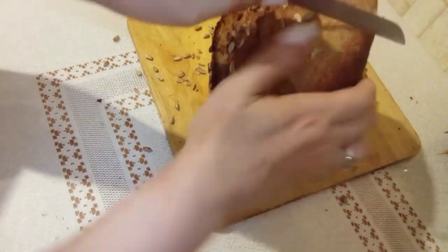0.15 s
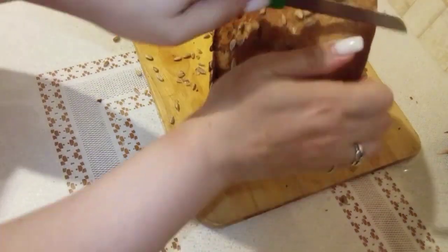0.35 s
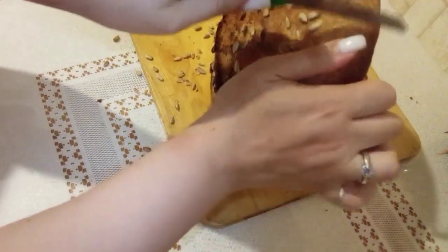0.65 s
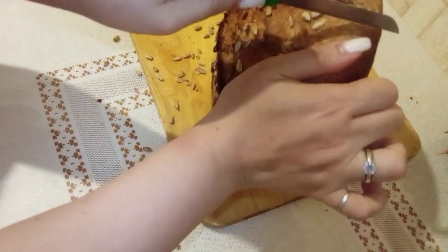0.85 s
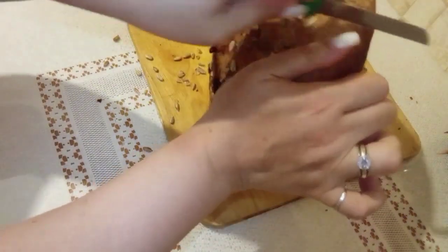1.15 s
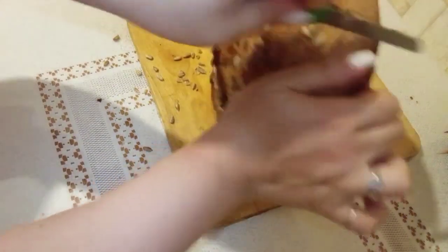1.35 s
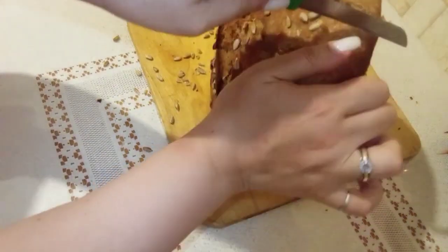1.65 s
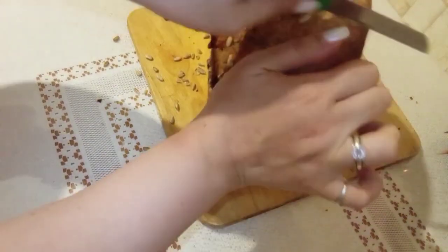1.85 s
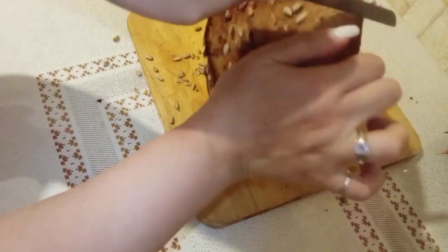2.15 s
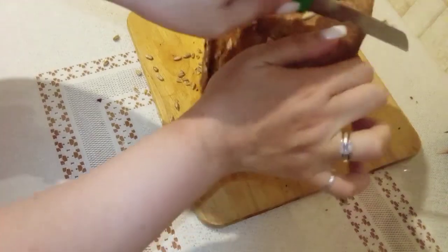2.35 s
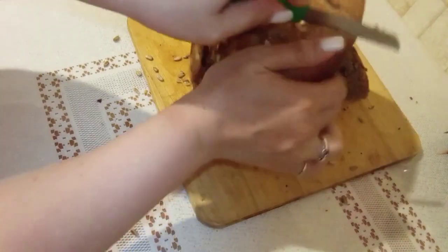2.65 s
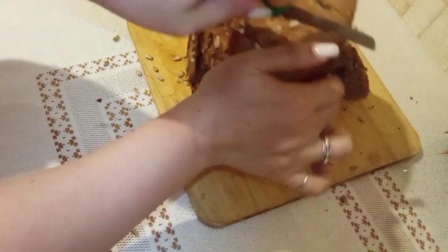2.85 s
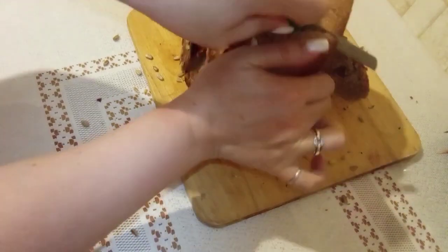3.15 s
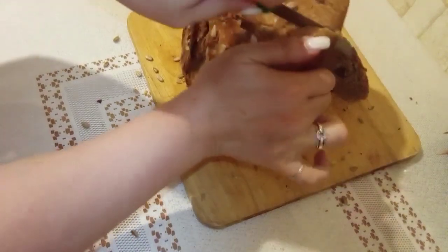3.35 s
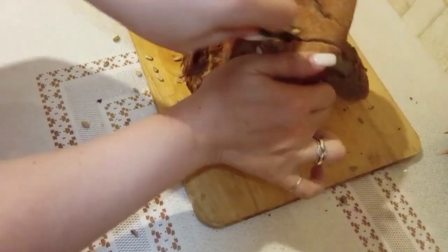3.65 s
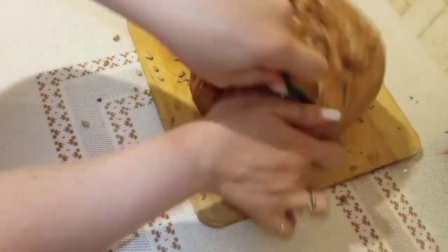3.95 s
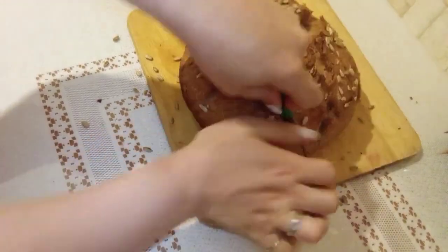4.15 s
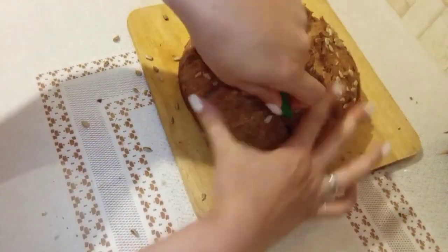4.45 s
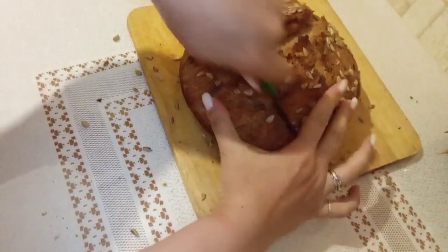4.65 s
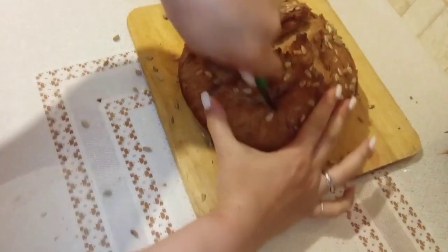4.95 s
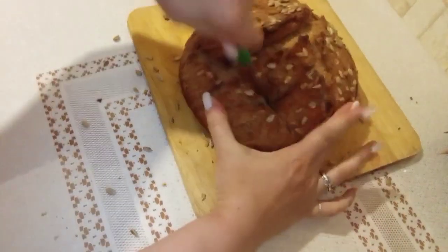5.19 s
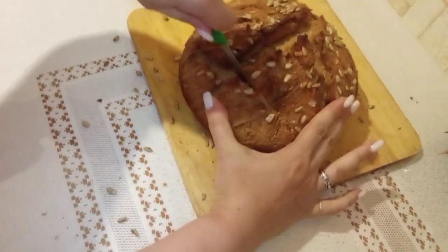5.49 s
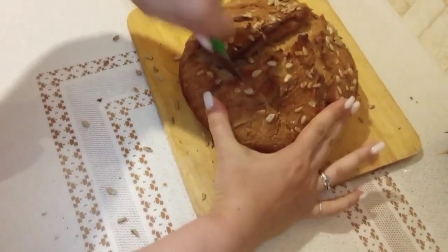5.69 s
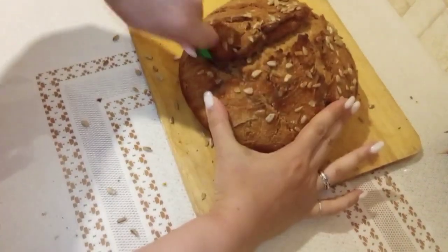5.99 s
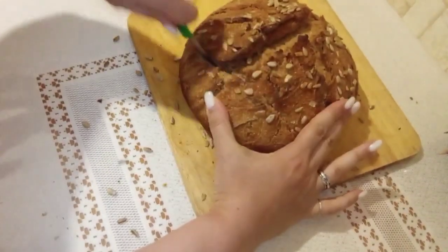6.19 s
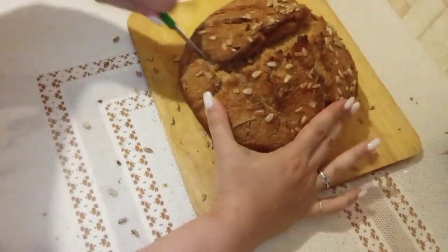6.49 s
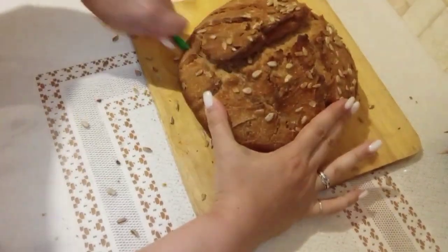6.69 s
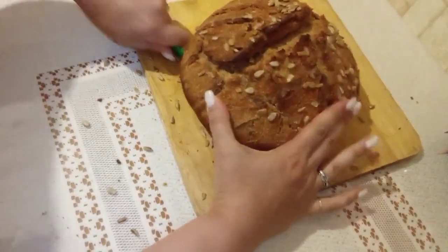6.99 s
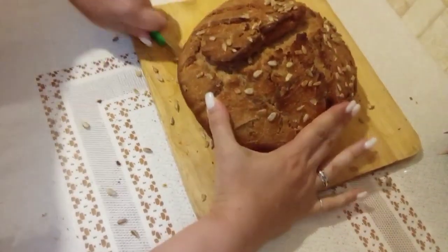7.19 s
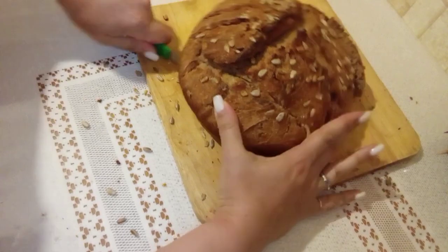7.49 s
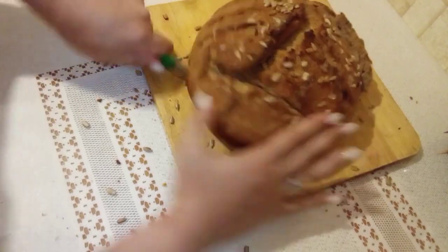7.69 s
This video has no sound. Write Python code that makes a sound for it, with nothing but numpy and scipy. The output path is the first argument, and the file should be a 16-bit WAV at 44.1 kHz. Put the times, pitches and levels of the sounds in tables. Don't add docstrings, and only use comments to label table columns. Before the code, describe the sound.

A close phone microphone picks up bread being cut on a wooden board in a small, quiet kitchen with a short echo, soft room air and a barely audible fridge hum. The first 0.8 seconds are nearly silent, with tiny ticks. A small crack and knock at 0.8 begin light, uneven sawing, about five strokes a second, raspy and gritty, strongest near 1.4 and 1.9. A crisp crack snaps at 2.65. From 3.0 to 3.6 the crust tears loudly in brittle crunches, peaking with a sharp snap at 3.5. At 4.2 a heavy low thump comes with a crunch, followed by little seed ticks. Slower pressing strokes crunch and knock the board at 4.9, 5.25, 5.6 (the fullest) and 6.0, thumping the table. Smaller crackles at 6.3, 6.65 and 6.95 mix with thin squeaky rubs. After 7.1 only faint rubbing and a tick remain.

```python
import sys
import numpy as np
from scipy import signal
from scipy.io import wavfile
from scipy.ndimage import uniform_filter1d

SR = 44100
rng = np.random.default_rng(int(sys.argv[2]) if len(sys.argv) > 2 else 0)


def gain_from_db(level_db):
    decades = np.asarray(level_db, float) / 20
    return 10 ** decades


def master_out(mix):
    frames = np.transpose(np.atleast_2d(mix))
    ceiling = np.clip(frames, -1, 1)
    pcm = np.round(ceiling * 32767).astype(np.int16)
    wavfile.write(sys.argv[1], SR, pcm)


N = 345303

# peak_s, tearing_db, rise_s, fall_s, board_shake_above_tearing_db
KNIFE_STROKES = [(1.077, -58, 0.11, 0.16, 3.5), (1.238, -54, 0.095, 0.076, 6.5),
                 (1.439, -39.5, 0.066, 0.099, -9), (1.635, -45, 0.055, 0.12, -11),
                 (1.889, -41.5, 0.1, 0.11, -5.5), (2.121, -51, 0.11, 0.079, -4),
                 (2.332, -54, 0.079, 0.39, -3), (2.519, -68, 0.22, 0.084, 15),
                 (2.649, -51.5, 0.01, 0.15, -29), (2.868, -45, 0.056, 0.051, -20),
                 (3.033, -62, 0.26, 0.1, -33), (3.136, -29, 0.059, 0.11, -10),
                 (3.348, -37.5, 0.13, 0.078, -7.5), (3.502, -31, 0.052, 0.13, -6),
                 (3.723, -46, 0.29, 0.054, -6), (3.844, -45, 0.065, 0.099, -30),
                 (4.149, -55, 0.085, 0.068, -4.5), (4.196, -36.5, 0.027, 0.051, 2.5),
                    (4.499, -58.5, 0.035, 0.18, -26), (4.706, -45.5, 0.16, 0.2, -1.5),
                    (4.911, -33.5, 0.078, .11, 1), (5.072, -68, 0.19, 0.17, 19.5),
                    (5.266, -33.5, 0.037, 0.1, 4), (5.628, -28.5, 0.046, 0.096, -5.5),
                    (5.82, -49, 0.32, 0.38, -6), (5.989, -36.5, 0.039, 0.064, -4),
                    (6.096, -56, 0.24, 0.059, 3.5), (6.303, -36.5, 0.045, 0.11, -4.5),
                    (6.663, -36, 0.081, 0.099, -8.5), (6.884, -56.5, 0.25, 0.25, -10),
                    (6.97, -37, 0.035, 0.12, 1.5), (7.042, -42, .15, 0.083, 3), (7.2, -68.5, .15, 0.091, 0),
                    (7.361, -60.5, 0.13, 0.072, -2.5), (7.47, -64, 0.066, 0.15, -7),
                    (7.83, -62, 0.29, .1, -4)]
# time_s, scraping_db, board_shake_above_scraping_db,
# crumb_fizz_above_tearing_db, pressed_board_region_hz
BLADE_CONTACT = [(0, -83.5, -24, -20, 400), (.9, -92, 0, -4, 434), (1.25, -97, -4, -8, 455),
                 (1.451, -67, -10, -8, 830), (1.9, -80, -23, -10.5, 494), (2.4, -69.5, 15, -2.5, 413),
                 (2.8, -80, -38, -14, 650), (3.2, -52.5, -11, -6.5, 630), (3.85, -66.5, -1, -11, 514),
                 (3.999, -63.5, 9.5, -15, 453), (4.398, -75, -3.5, -8, 600), (5.351, -59, -5, -10, 756),
                 (5.56, -77, 10, -16.5, 600), (5.75, -68.5, -13, -3.5, 600), (6.5, -72, 1.5, -16, 474),
                 (6.65, -89, -14, -5, 600), (7.05, -71, -5, -26, 423), (7.3, -80, -12, -8, 600)]
SCRAPING, SHAKE, FIZZ, PRESSED = 1, 2, 3, 4
# pitch_hz, level_db (per Hz)
CRUST_COLOUR = [(530, -46), (900, -6.5), (1270, -2.5), (1410, 2.5), (2440, 1.5), (3470, 0), (3830, 0),
                (5260, 1), (7950, -11.5), (9660, -5.5), (13400, -21), (15200, -11), (15900, -11),
                (16500, -17)]
# pitch_hz, width_hz, level_db
BOARD_MODES = [(206.7, 24, -5), (261.4, 30.3, -4), (316.6, 48, 3), (407.7, 118.4, 4), (538.6, 45, -2),
               (600, 13.3, -13), (680, 147, -1.5), (799.3, 190, 4.5), (958, 110, -4), (1027, 260, -3)]
# pitch_hz, width_hz, level_db
TABLE_MODES = [(65, 20, -30.5), (102, 75, -17), (120, 25.4, 7)]
# peak_s, level_db, rise_s, fall_s
ARM_PUSHES = [(1.09, -47.5, 0.087, 0.23), (1.24, -47.5, 0.062, 0.052), (1.633, -52, 0.048, 0.12),
              (1.956, -45.5, 0.061, 0.11), (2.123, -50, 0.13, 0.091), (2.334, -51, 0.059, 0.096),
              (2.519, -47, 0.06, 0.15), (3.15, -44, 0.084, 0.17), (3.49, -41.5, 0.044, 0.23),
              (3.72, -50, 0.16, 0.039), (3.996, -46, 0.11, 0.038), (4.2, -29.5, 0.033, 0.075),
              (4.93, -44.5, 0.12, 0.23), (5.09, -56, 0.14, 0.24), (5.264, -37.5, 0.076, 0.1),
              (5.64, -31, 0.11, 0.2), (5.86, -42.5, 0.1, 0.42), (5.989, -30.5, 0.092, .06),
              (6.096, -45, 0.12, 0.076), (6.33, -53.5, 0.14, 0.18), (6.68, -40, 0.072, 0.092),
              (6.99, -43, 0.071, 0.14), (7.49, -61, 0.14, 0.065)]
# start_s, peak_db, centre_hz, knock_above_peak_db, snap_t60_s
BOARD_KNOCKS = [(.818, -34, 1620, 7, 0.011), (1.386, -46, 2900, 5, 0.015), (2.0485, -43, 3700, -18, 0.015),
                (3.0896, -28.5, 1940, -33, 0.011), (3.5214, -15, 2430, -5, 0.0077),
                (3.6872, -26.5, 1800, -3.5, 0.0078), (4.0492, -35.5, 4650, 1.5, 0.019),
                (4.1841, -25.5, 1020, 0, 0.022), (4.812, -33, 5240, -19, 0.018),
                (4.8636, -24.5, 1410, 3.5, 0.011), (4.9134, -23.5, 1190, 9.5, 0.018),
                (5.2357, -26.5, 940, 12.5, 0.0041), (5.2796, -20.5, 4530, 0, 0.016),
                (5.576, -53, 2460, -20, 0.0059), (5.5882, -19.5, 1340, -7, 0.01),
                (5.8538, -30.5, 3440, -1, 0.0098), (5.897, -27.5, 5360, -23, 0.021),
                (5.9728, -25.5, 2200, 4.5, 0.017), (6.0868, -33, 4030, -16, 0.032),
                (6.2896, -39, 4740, 9, 0.007), (6.594, -33, 1690, -31, 0.027),
                (6.6294, -41, 3000, -19, 0.0058), (6.651, -26.5, 1480, -25, 0.016),
                (6.949, -25.5, 1520, -32, 0.015)]
# start_s, peak_db, centre_hz, breadth_octaves, snap_t60_s
CRUST_CRACKS = [(0.3073, -36, 3860, 1.56, 0.0095), (.818, -31.5, 5980, 0.86, 0.0042),
                (1.675, -31.5, 9740, 1.3, 0.015), (1.7697, -47, 9100, 0.48, .009),
                (2.6486, -23.5, 3744, 1.8, 0.014), (2.9527, -27, 2940, 1.63, 0.009),
                (3.052, -34, 2490, 2.5, .01), (3.0655, -27.5, 4830, 1.16, 0.013),
                (3.462, -32, 1880, 1.2, 0.013), (3.472, -28, 2380, 1.5, 0.0045),
                (3.496, -15, 5600, 1.7, 0.0058), (3.8377, -30.5, 6600, 0.84, .012),
                (3.8541, -26, 4550, 0.95, 0.0066), (4.433, -43, 3000, 1.6, 0.029),
                (4.5383, -28.5, 9910, 1.65, .0075), (4.6025, -26, 3970, .51, 0.0096),
                (4.8753, -24, 4800, 0.87, 0.0069), (4.8878, -20.5, 3820, 1, 0.01),
                (5.2101, -28.5, 10940, 1.4, 0.011), (5.4136, -34, 2360, 2.4, 0.025),
                (5.6061, -20.5, 3940, 2.17, 0.027), (6.1766, -27.5, 2500, 1.93, 0.012),
                (6.2743, -31.5, 4750, 1.24, 0.011), (6.317, -20, 1370, 2, 0.0026)]
# start_s, peak_db, centre_hz,
# breadth_octaves, snap_t60_s
SMALL_TICKS = [(0.434, -49.5, 1920, 3.03, 0.0097), (0.4673, -56.5, 4550, 1.9, 0.02),
               (0.963, -53, 5640, 3, 0.014), (2.7479, -45.5, 1870, 0.68, 0.014),
               (3.988, -41, 4700, 0.57, 0.011), (4.123, -42, 6200, 0.49, 0.017),
               (4.2865, -47.5, 4290, 0.68, 0.019), (4.309, -45, 1436, 1.15, 0.027),
               (4.395, -52, 1420, 0.26, 0.022), (4.4747, -43, 2230, 1.3, 0.018),
               (4.524, -65, 9910, 0.85, 0.0096), (5.3894, -40.5, 2200, 0.45, 0.01),
               (5.717, -36, 9500, 0.67, 0.012), (5.7404, -39, 4660, 0.43, 0.011),
               (6.517, -50.5, 5200, 1.36, 0.025), (4.374, -45.5, 1395, 0.35, 0.024),
               (4.4845, -35.5, 2280, 0.2, 0.012), (4.5128, -33, 2640, 0.82, 0.0085),
               (7.44, -43.5, 2470, 0.69, 0.016), (3.7994, -46, 6100, 1.1, 0.011),
               (0.7945, -58, 2160, 0.53, 0.015),]
# start_s, length_s,
# pitch_hz, width_hz, level_db
RUBS = [(.63, .05, 10000, 900, -74), (6.19, .09, 4310, 60, -65), (6.37, .17, 4750, 160, -60),
        (6.53, .06, 4100, 80, -73), (6.48, .06, 205, 40, -55), (6.8, .11, 5000, 600, -59),
        (7.3, .09, 1050, 150, -62), (7.3, .07, 1350, 150, -64), (7.46, .07, 130, 25, -58),
        (7.74, .12, 820, 120, -65), (6.18, .07, 2600, 700, -59), (1.68, .1, 9900, 700, -62),
        (6.48, .07, 1200, 900, -60), (.82, .09, 640, 300, -69)]
# pitch_hz, t60_s
ECHO_TIMES = [(200, 0.21), (700, 0.12), (2000, 0.094), (5000, 0.15), (14000, 0.11)]
# pitch_hz, level_db (per Hz)
ROOM_COLOUR = [(13, -38), (22, -18), (43, -12), (101, -4), (145, -6), (426, -5.5), (926, -19),
               (1030, -13.5), (2010, -22.5), (5600, -23.5), (8260, -37), (15200, -33), (16500, -49.5)]
# pitch_hz, level_db
FRIDGE_HUM = [(96.9, -77), (236.9, -91.5), (1373, -101), (2487, -92.5)]

FIZZ_HZ = 7500
FIZZ_LINGER, SHAKE_LINGER = 0.77, 1.05
SWING_DB, ROUNDING = 28.5, 1.602
TABLE_REST_DB, AIR_DB = -81, -76.5


def tearing():
    level_db = stroke()
    busy = np.clip(gain_from_db(0.31 * (level_db + 38.5)), 0.25, 1)
    breaks = slips(per_s=6000 * busy, spread_db=-2.5, clump_db=3.5, clump_s=0.007)
    kind = rng.integers(0, 40, N)
    t = np.arange(1000) / SR
    swarm = np.zeros(N)
    favoured = gain_from_db(4.8 * np.clip(drift(0.035, count=40), -3, 2))
    for k, hz in enumerate(np.geomspace(900, 16000, num=40)):
        grain = np.sin(2 * np.pi * hz * t) * np.exp(-t * hz / 10.7)
        grain *= np.sqrt(hz) / np.linalg.norm(grain)
        swarm += signal.oaconvolve(breaks * favoured[k] * (kind == k), grain)[:N]
    teeth = slips(per_s=2200 * busy, spread_db=3.4, clump_db=3, clump_s=0.003)
    swarm = evened(swarm) + 1.02 * np.sqrt(busy) * teeth
    swarm = signal.oaconvolve(swarm, causal(CRUST_COLOUR))[:N]
    swarm /= np.sqrt(uniform_filter1d(swarm ** 2, 2500))
    low = signal.sosfilt(signal.butter(4, FIZZ_HZ, "low", fs=SR, output="sos"), swarm)
    high = signal.sosfilt(signal.butter(4, FIZZ_HZ, "high", fs=SR, output="sos"), swarm)
    fizz_db = stroke(FIZZ_LINGER) + contact(FIZZ)
    return gain_from_db(level_db) * evened(low) + gain_from_db(fizz_db) * evened(high)


def stroke(linger=0.91, shake=0):
    strokes = KNIFE_STROKES
    rows = [(s, db + shake * above_db, rise, fall) for s, db, rise, fall, above_db in strokes]
    return swells(rows, contact(SCRAPING) + shake * contact(SHAKE), linger)


def contact(column):
    rows = np.array(BLADE_CONTACT)
    return np.interp(np.arange(N) / SR, rows[:, 0], rows[:, column])


def swells(rows, rest_db, linger=0.87):
    t = np.arange(0, N, 64) / SR
    s, db, rise, fall = np.transpose(rows)[:, :, None]
    away = np.where(t < s, (s - t) / abs(rise), (t - s) / abs(fall * linger))
    total = np.sqrt((gain_from_db(db - SWING_DB * away ** ROUNDING) ** 2).sum(0))
    total = np.interp(np.arange(N) / SR, t, total)
    return 20 * np.log10(np.hypot(total, gain_from_db(rest_db)))


def slips(per_s, spread_db, clump_db, clump_s):
    clicks = rng.random(N) < per_s / SR
    size = np.minimum(rng.exponential(1, N), 4)
    sign = rng.choice([-1., 1.], N)
    span = max(int(clump_s * SR), 8)
    clumps = evened(uniform_filter1d(uniform_filter1d(rng.standard_normal(N), span), span))
    return evened(clicks * sign * gain_from_db(spread_db * size + clump_db * clumps))


def board():
    jerks = slips(per_s=790, spread_db=2.5, clump_db=1.5, clump_s=0.028)
    jerks *= gain_from_db(stroke(SHAKE_LINGER, shake=1))
    pressed = np.log2(contact(PRESSED))
    reach = np.array([gain_from_db(db - 7.7 * abs(np.log2(hz) - pressed)) for hz, width, db in BOARD_MODES])
    reach *= gain_from_db(4 * drift(0.04, count=len(BOARD_MODES)))
    reach /= np.linalg.norm(reach, axis=0)
    return sum(ring([mode], jerks * share) for mode, share in zip(BOARD_MODES, reach))


def ring(modes, x):
    t = np.arange(4096) / SR
    body = np.zeros(4096)
    for hz, width, db in modes:
        fade = t * np.exp(-5 * width * t)
        body += gain_from_db(db) * width ** 1.5 * fade * np.sin(2 * np.pi * hz * t)
    return signal.oaconvolve(x, body / np.linalg.norm(body))[:len(x)]


def table():
    jolts = slips(per_s=900, spread_db=1.5, clump_db=1.5, clump_s=0.011)
    return ring(TABLE_MODES, gain_from_db(swells(ARM_PUSHES, TABLE_REST_DB)) * jolts)


def cracks():
    out, knocks = np.zeros(N), np.zeros(N)
    for s, db, hz, knock_db, t60 in BOARD_KNOCKS:
        add(out, s, snap(db, hz, 1.9, t60, ringing=0.57))
        add(knocks, s, gain_from_db([db + knock_db + 5]))
    for s, *piece in CRUST_CRACKS:
        add(out, s, snap(*piece, ringing=0.45))
    for s, *piece in SMALL_TICKS:
        add(out, s, snap(*piece, ringing=1.0))
    return out + ring(BOARD_MODES[4:], knocks)


def snap(db, hz, octaves, t60, ringing):
    puff = rng.standard_normal(1500)
    t = np.arange(len(puff)) / SR
    half = 2 ** (np.clip(octaves, 0.05, 5) / 2)
    t60 = max(t60, 0.002)
    burst = puff * np.minimum(t / 0.00045, 1) * gain_from_db(-60 * t / t60)
    burst = band(burst, hz / np.sqrt(half), hz * half * np.sqrt(half))
    others = np.tanh(puff[:3])
    side_rings = sum(np.sin(2 * np.pi * hz * half ** (1.5 * u) * t) for u in others)
    rings = np.sin(2 * np.pi * hz * t) + 0.42 * side_rings
    rings *= gain_from_db(-60 * t / (2.4 * t60)) * np.minimum(t / 0.0004, 1)
    burst = burst / abs(burst).max() + ringing * rings
    return gain_from_db(db) * burst / abs(burst).max()


def rubs():
    out = np.zeros(N)
    for s, length, hz, width, db in RUBS:
        hiss = rng.standard_normal(12000)
        sung = band(hiss, hz - width / 2, hz + width / 2)[3000:]
        sung = evened(sung[:int(length * SR)])
        flutter = evened(uniform_filter1d(hiss, 400))[:len(sung)]
        add(out, s, gain_from_db(db + 4.2 * flutter) * sung * signal.windows.tukey(len(sung), 0.6))
    return out


def kitchen(x):
    taps = np.zeros(SR // 2)
    at = np.arange(130, len(taps) - 20, 20)
    taps[at + rng.integers(0, 20, len(at))] = rng.choice([-1., 1.], len(at))
    hz, t, z = signal.stft(taps, SR, nperseg=256)
    fade = gain_from_db(-60 * t / read(ECHO_TIMES, hz)[:, None])
    tail = signal.istft(z * fade, SR, nperseg=256)[1]
    return signal.fftconvolve(x, tail / np.linalg.norm(tail))[:N]


def quiet():
    frames, hz = N // 512 + 5, np.fft.rfftfreq(2048, 1 / SR)
    a, b, patches = rng.standard_normal((frames, 1025, 3)).T
    patches = evened(uniform_filter1d(uniform_filter1d(patches, 20, 0), 8, 1))
    air = (a + 1j * b) * gain_from_db(read(ROOM_COLOUR, hz)[:, None] + 1.6 * patches)
    air = signal.istft(air, nperseg=2048, noverlap=1536)[1][:N]
    t = np.arange(N) / SR
    waver = rng.standard_normal((len(FRIDGE_HUM), N))
    waver = evened(uniform_filter1d(uniform_filter1d(waver, 3000), 3000))
    hum = np.zeros(N)
    for (f, db), w in zip(FRIDGE_HUM, waver):
        hum += gain_from_db(db + 3 + 2.5 * w) * np.sin(2 * np.pi * f * t + 0.8 * w)
    return gain_from_db(AIR_DB) * evened(air) + hum


def evened(x):
    return x / np.sqrt(np.mean(x ** 2) + 1e-20)


def read(points, hz):
    f, value = np.transpose(points)
    return np.interp(np.log(hz + 1), np.log(f + 1), value)


def add(mix, s, sound):
    part = mix[round(s * SR):][:len(sound)]
    part += sound[:len(part)]


def causal(points, size=1024):
    log_gain = np.log(gain_from_db(read(points, abs(np.fft.fftfreq(4 * size, 1 / SR)))))
    return np.fft.ifft(np.exp(np.conj(signal.hilbert(log_gain)))).real[:size]


def band(x, lo_hz, hi_hz):
    edges = np.clip([lo_hz, hi_hz], 20, SR / 2.2)
    return signal.sosfilt(signal.butter(3, edges, "band", fs=SR, output="sos"), x)


def drift(span_s, count):
    span = max(int(span_s * SR / 64), 2)
    rows = rng.standard_normal((count, N // 64 + 1))
    rows = evened(uniform_filter1d(uniform_filter1d(rows, span), span))
    return np.repeat(rows, 64, axis=1)[:, :N]


def scene():
    near = gain_from_db(-1.5) * tearing() + board() + cracks() + rubs()
    return (near + gain_from_db(-10.5) * kitchen(near) + gain_from_db(-4.3) * table())[None]


def top_cut(x):
    return signal.sosfilt(signal.butter(12, 16970, fs=SR, output="sos"), x)


def record(dry):
    near = signal.sosfilt(signal.butter(3, 52, "high", fs=SR, output="sos"), dry)
    mix = near + quiet()
    mix = signal.sosfilt(signal.ellip(8, 0.5, 45, 15900, fs=SR, output="sos"), mix)
    return top_cut(mix)


dry = scene()
out = record(dry)
master_out(out)
```